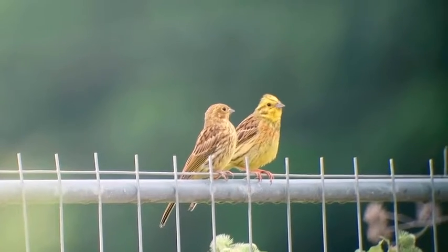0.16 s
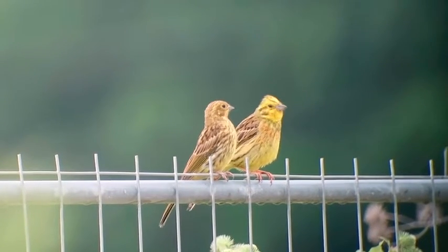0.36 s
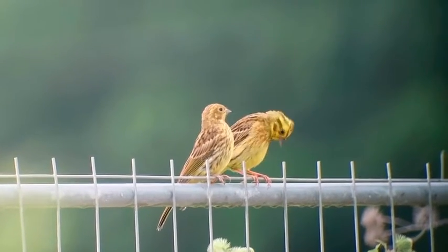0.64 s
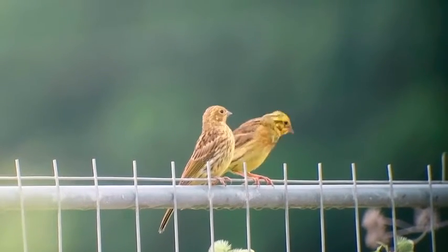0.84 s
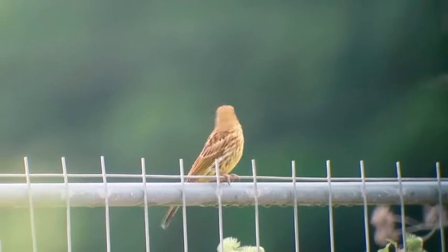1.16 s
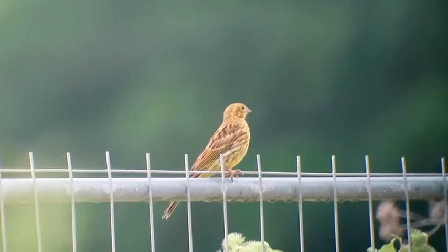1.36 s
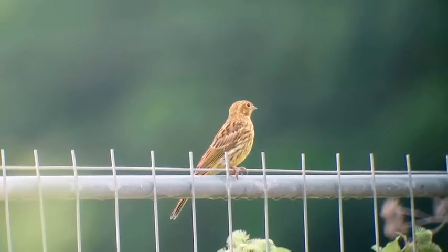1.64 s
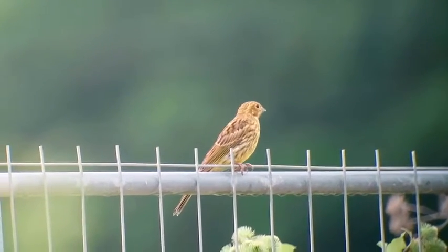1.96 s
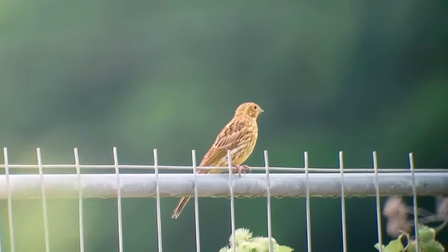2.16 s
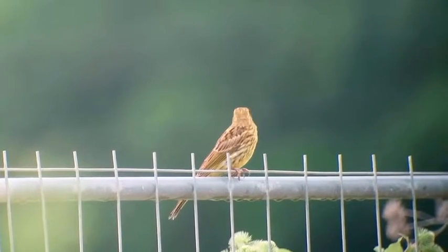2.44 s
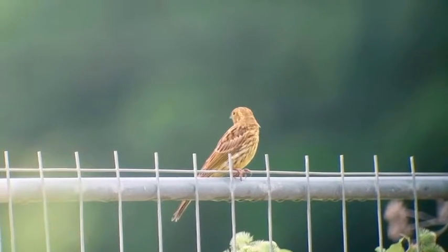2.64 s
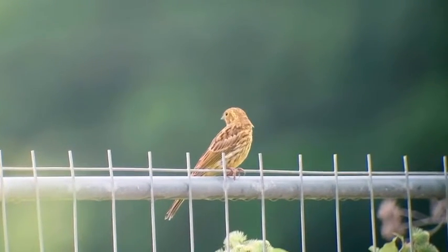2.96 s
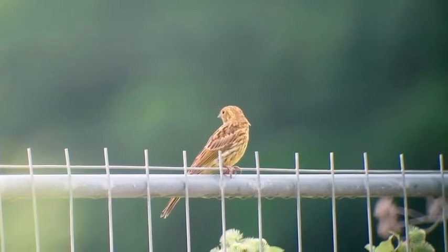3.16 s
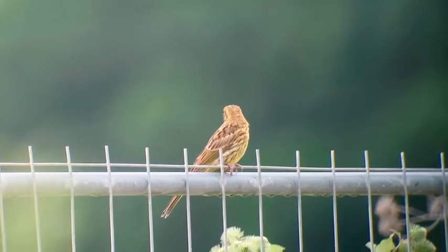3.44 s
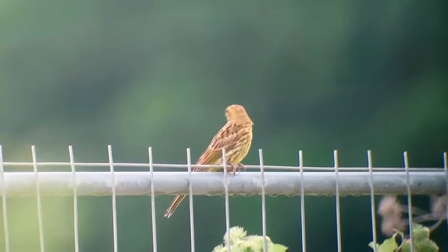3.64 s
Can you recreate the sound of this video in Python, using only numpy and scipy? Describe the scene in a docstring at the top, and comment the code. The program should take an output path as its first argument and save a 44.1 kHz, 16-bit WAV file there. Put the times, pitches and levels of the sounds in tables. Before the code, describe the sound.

A distant songbird repeats falling buzzy trills with short whistles between, softly echoing; a nearer bird chirps once early. Low engine-like drone, traffic rumble and airy hiss lie beneath, with two small ticks close to the microphone.

```python
"""Countryside birdsong over a low drone

A distant songbird sings falling, buzzy trills (pulsed glides) with short curved whistles between them, in
scattered echoes; a nearer bird chirps once and farther birds twitter at random. A low engine-like drone, a
gliding tone with an unsteady octave, swells and fades over traffic hums, rumble and airy hiss (shaped noise).
Something ticks twice close to the microphone (decaying resonances), and a faint high sine whine fades away."""
import sys
import numpy as np
from scipy import signal
from scipy.io import wavfile
from scipy.ndimage import uniform_filter1d

SR = 44100
rng = np.random.default_rng(int(sys.argv[2]) if len(sys.argv) > 2 else 0)


def transcribe(u):
    """Save the signal u as a 16-bit wav file named by the first command-line argument.

    u: samples, shape (n,) or (channels, n), limited to [-1, 1]; the rate is SR.
    q: integer samples, one column per channel.
    """
    v = np.clip(np.atleast_2d(u).T, -1, 1)
    q = np.round(v * 32767).astype(np.int16)
    wavfile.write(sys.argv[1], SR, q)


N = 167580
T = np.arange(N) / SR

# Falling trills of the far bird, levels before pulsing and echoes; a start below 0 plays at 0:
# start_s, length_s, first_pitch_hz, last_pitch_hz, bend (exponent of the fall), pulses_per_s,
# pulse_sweep_hz, rasp_hz, loudest_at (share of length), level_db
TRILL_NOTES = [(-.008, .215, 3800, 2530, 1.2, 41, -520, 250, .48, -35),
               (.745, .16, 4000, 2950, 2.4, 59, 600, 170, .5, -46.5),
               (1.125, .16, 3950, 2950, 3.6, 59, 450, 110, .72, -43.5),
               (1.458, .29, 4080, 2440, 1.3, 41, -380, 290, .36, -42),
               (2.258, .16, 4200, 2930, 2.6, 61, 680, 130, .56, -35.5),
               (2.609, .175, 4200, 2960, 3, 63, 620, 130, .66, -36.5),
               (3.105, .162, 4350, 2960, 2.6, 62, 700, 150, .72, -36),
               (3.665, .28, 3950, 2550, 1.2, 43, -400, 190, .4, -42)]
# Whistles of the far bird, levels before echoes; rasp is 1.4 times the rms pitch jitter:
# start_s, length_s, first_pitch_hz, middle_pitch_hz, last_pitch_hz, level_db, left_lead_ms, rasp_hz
WHISTLE_NOTES = [(.05, .075, 4350, 4000, 3920, -52, .09, 80), (.3, .019, 4400, 4600, 4500, -50, -.04, 100),
                 (.39, .06, 5500, 5300, 4700, -49, .1, 140),
                 (.448, .041, 4500, 4280, 4150, -43.5, .055, 35),
                 (.487, .038, 4200, 4010, 3880, -39.5, .06, 40),
                 (.669, .041, 4330, 4250, 4330, -44, .01, 130), (1.038, .03, 4180, 4190, 4230, -52, 0, 80),
                 (1.26, .025, 3980, 3920, 4000, -51, 0, 60), (1.41, .06, 3900, 4030, 4130, -55, .03, 80),
                 (1.705, .075, 3900, 3400, 3300, -54, .04, 130),
                 (1.845, .04, 4300, 4190, 4300, -44.5, -.04, 120),
                 (1.977, .081, 4450, 4020, 3870, -42, .046, 40),
                 (2.187, .04, 4300, 4180, 4280, -43.5, .035, 130),
                 (2.535, .036, 4350, 4170, 4100, -40, .057, 160),
                 (2.575, .012, 3380, 3400, 3400, -44, .06, 40),
                 (2.595, .013, 3400, 3440, 3420, -42, .06, 40),
                 (2.615, .055, 3420, 3400, 3330, -40.5, .07, 25),
                 (2.808, .05, 4390, 3805, 3170, -45, .12, 140),
                 (2.873, .069, 7540, 7700, 7950, -56, -.03, 40),
                 (2.975, .051, 3600, 3580, 3560, -46, .09, 50),
                 (3.035, .04, 4250, 4170, 4250, -43, .068, 160),
                 (3.095, .11, 7900, 7975, 7940, -54, -.02, 20),
                 (3.2, .055, 7940, 7830, 7620, -58, -.02, 40),
                 (3.398, .042, 4320, 4164, 3750, -46, .066, 170),
                 (3.432, .016, 2770, 2900, 2990, -41.5, .028, 50),
                 (3.453, .044, 3550, 3440, 3100, -43, .05, 70),
                 (3.475, .05, 4250, 4050, 3950, -51, .06, 140),
                 (3.525, .06, 4050, 3850, 3600, -48, .09, 160), (3.561, .014, 2870, 2940, 2940, -42, 0, 50),
                 (3.589, .042, 3610, 3440, 3150, -43, .06, 80)]
# The near chirp, a pulsed upper voice over a harsh lower one; columns as for the trills:
# start_s, length_s, first_pitch_hz, last_pitch_hz, bend (exponent), pulses_per_s,
# pulse_sweep_hz, rasp_hz, loudest_at (share of length), level_db
CHIRP_VOICES = [(.3155, .04, 5700, 5380, 1, 125, -350, 130, .54, -27),
                (.319, .07, 4650, 4550, 1, 210, 300, 280, .47, -28.5)]
# Path of the drone, levels before its two trims: start_s, pitch_hz, fundamental_db, octave_db
DRONE_PATH = [(0.0, 78.4, -25.5, -35.5), (.11, 79.3, -27, -34), (.21, 78.64, -22, -40.5),
              (.36, 78.07, -23, -42.5), (0.47, 78.1, -27.5, -47), (0.75, 78.9, -17.5, -40),
              (1.07, 78.17, -17, -46), (1.2, 79.5, -22, -36), (1.279, 76.9, -40, -35),
              (1.359, 76.8, -25.5, -46.5), (1.5, 79.3, -22.5, -33.5), (1.65, 78.63, -22, -40.5),
              (1.779, 78.9, -31.5, -39), (1.9, 78.21, -22, -40), (2.18, 78.9, -32.5, -45),
              (2.43, 81.53, -34.5, -39), (2.5, 77.5, -41, -32), (2.91, 79.1, -32, -38.5),
              (3.04, 78.43, -20, -35.5), (3.15, 78.18, -22, -36), (3.21, 77.88, -28, -36),
              (3.48, 77.83, -19, -40), (3.73, 77.8, -23, -54), (3.8, 76.1, -23.5, -38)]
# Wavering hums of the traffic: pitch_hz, width_hz, level_db, loudest_s, swell_s
TRAFFIC_HUMS = [(43.1, 5.4, -44.5, 1.7, 6.8), (236.2, 7.2, -39, 0.28, 0.52), (240.7, 7.2, -40, 2.5, 0.83),
                (235.4, 6, -32, 3.73, 0.24), (292.6, 3.3, -46.5, 0.58, 3.23), (305.3, 34, -39, 2.306, 0.19),
                (656, 89, -44, 0.63, 0.2), (1188, 7.8, -61.5, 2, 6.3)]
# Relative colour of the rumble and hiss: frequency_hz, density_db (per Hz)
AIR_COLOUR = [(12, -46.5), (25, -22), (55, -4.5), (85, -9.5), (122, -12), (200, -16), (300, -21),
              (400, -24), (570, -26.5), (850, -27), (1200, -31), (1400, -34), (2170, -37), (4000, -41),
              (5000, -43.5), (6300, -46.5), (8000, -49.5), (9400, -51.5), (10300, -68.5), (12500, -60),
              (14000, -99)]
# Left-right likeness of the air, 1 the same, 0 unrelated, -1 opposite: frequency_hz, likeness (-1 to 1)
AIR_LIKENESS = [(30, 0.98), (130, 1), (260, 0.85), (500, 0.19), (1000, -0.16), (2200, -0.54), (4000, -0.53),
                (9000, -0.69)]
# Relative level of the rumble and hiss above the bass: start_s, level_db
AIR_RIDE = [(0, 2.5), (0.551, 2), (0.998, -1.5), (1.348, -0.5), (1.801, 1), (2.249, 2.5), (2.8, 2.5),
            (3.3, 3), (3.8, -1.5)]
# Fading of the thin whine: start_s, level_db
WHINE_FADE = [(0, -63), (1.4, -66.5), (1.55, -73.5), (3.8, -85.5)]
# The two ticks, gain over the ringing modes: start_s, level_db, treble_tilt_db (per octave), rise_s
TICK_HITS = [(2.2249, -13.2, 0, .0004), (3.6525, -20.5, -8, .0006)]
# What a tick rings with, levels before tilt and gain: pitch_hz, level_db, t60_s
TICK_RING = [(318, -8.5, .04), (421, -3, 0.032), (702, -17, 0.09), (2740, -7, 0.024), (4150, -7, .005),
             (4500, 11.5, 0.0055), (5970, 2.5, 0.011), (9820, -11, 0.0028)]

# A positive lead puts the left ear's phase ahead, a negative one the right's.
TRILL_LEAD_MS, CHIRP_LEAD_MS, TICK_LEAD_MS = 0.07, -0.071, -.09
TRILL_EDGE_DB, PULSE_SHARP, PULSE_GAP, OCTAVE_DB = -8, 1.6, .06, -28  # the gap is the gain between pulses
RASP_SKEW, WHISTLE_SWELL = .9, 0.68  # exponents
FAR_RIGHT_DB = -3.5
TRILL_BLUR_DB, TRILL_BLUR_T60_S = -7, .06
BLUR_DB, BLUR_T60_S = -1.5, 0.047
ECHO_DB, ECHO_T60_S = -11.5, 0.48
CHIRP_ECHO_DB, CHIRP_ECHO_T60_S = -8, .13
DRONE_TRIM_DB, OCTAVE_TRIM_DB, OCTAVE_WIDTH_HZ = -1, 3, 16.3
AIR_DB, PATCH_DB, SWELL_DB = -31.5, 1.5, .6  # overall rms, then rms of the drifts
WHINE_HZ = 8240
TWITTER_PER_S, TWITTER_DB, TWITTER_RASP_HZ = 63, -61.5, 170
TWITTER_HZ, TWITTER_MEAN_S = 3570, 0.064  # centre pitch and average length
TWITTER_SPREAD, TWITTER_FALL = .11, 0.046  # shares of the pitch: half the largest shift each way, half the fall
TICK_BOUNCE_S, TICK_BOUNCE_DB, TICK_ECHO_DB = .0102, -20, -19
EDGE_HZ = 14500


def amp(db):
    """Decibels to gain."""
    return 10 ** (np.asarray(db) / 20)


def unit(x):
    """Scales to rms 1."""
    return x / np.sqrt(np.mean(abs(x) ** 2) + 1e-20)


def read(points, hz):
    """Reads a table on a log-frequency axis."""
    f, value = np.transpose(points)
    return np.interp(np.log(hz + 1), np.log(f + 1), value)


def add(mix, s, sound):
    """Mixes a stereo sound in at a time."""
    part = mix[:, max(round(s * SR), 0):][:, :sound.shape[1]]
    part += sound[:, :part.shape[1]]


def wander(width_hz, size=N):
    """Complex noise of rms 1, held to a narrow band around 0 Hz so that it drifts smoothly."""
    z = rng.standard_normal((size, 2)) @ [1, 1j]
    band = np.exp(-2 * (np.fft.fftfreq(size, 1 / SR) / width_hz) ** 2)
    return unit(np.fft.ifft(z * band))


def tone(hz, lead_ms):
    """A gliding stereo sine of rms 1 whose right side trails in phase by the left ear's lead."""
    turns = np.cumsum(hz) / SR
    both_ears = np.array([turns, turns - hz * lead_ms / 1000])
    return np.sqrt(2) * np.sin(2 * np.pi * both_ears)


def trees(x, t60):
    """Scattered echoes from ground and foliage: sparse decaying spikes, different on each side."""
    t = T[:SR // 2]
    spikes = rng.standard_normal((2, len(t))) * (rng.random((2, len(t))) < .05)
    tail = spikes * amp(-60 * t / t60)
    tail = tail / np.linalg.norm(tail, axis=1)[:, None]
    return signal.fftconvolve(x, tail, axes=1)[:, :N]


def trill(length, first_hz, last_hz, bend, rate, sweep_hz, rasp_hz, peak, db, lead_ms):
    """A falling note chopped into quick pulses, each a tiny glide; rough midway, clean at both ends."""
    t = T[:int(length * SR)]
    u = t / length
    cycle = (t * rate) % 1
    fall = last_hz + (first_hz - last_hz) * (1 - u) ** bend
    jitter = np.sqrt(2) * wander(900, size=SR // 2).real[:len(t)]
    rasp = rasp_hz * np.sin(np.pi * u ** RASP_SKEW) ** 2 * jitter
    hz = fall + sweep_hz * (cycle - .5) + rasp
    arch_db = TRILL_EDGE_DB * ((u - peak) / max(peak, 1 - peak)) ** 2
    ramps = np.minimum(np.minimum(u, 1 - u) * 20, 1)
    pulses = PULSE_GAP + (1 - PULSE_GAP) * abs(np.sin(np.pi * cycle)) ** PULSE_SHARP
    voice = tone(hz, lead_ms) + amp(OCTAVE_DB) * tone(2 * hz, lead_ms)
    return amp(db + arch_db) * ramps * pulses * voice


def whistle(length, first_hz, middle_hz, last_hz, db, lead_ms, rasp_hz):
    """One curved glide with a jittering pitch that swells and fades."""
    u = np.linspace(0, 1, int(length * SR))
    curve = np.polyfit([0, .5, 1], [first_hz, middle_hz, last_hz], 2)
    hz = np.polyval(curve, u) + rasp_hz * wander(320, size=SR // 2).real[:len(u)]
    return amp(db) * abs(np.sin(np.pi * u)) ** WHISTLE_SWELL * tone(hz, lead_ms)


def far_song():
    """Distant trills and whistles, blurred by short echoes and a longer tail, softer on the right."""
    trills, whistles = np.zeros((2, 2, N))
    for start, *note in TRILL_NOTES:
        add(trills, start, trill(*note, TRILL_LEAD_MS))
    for start, *note in WHISTLE_NOTES:
        add(whistles, start, whistle(*note))
    direct = trills + whistles
    trill_blur = amp(TRILL_BLUR_DB) * trees(trills, TRILL_BLUR_T60_S)
    whistle_blur = amp(BLUR_DB) * trees(whistles, BLUR_T60_S)
    echo = amp(ECHO_DB) * trees(direct, ECHO_T60_S)
    return (direct + trill_blur + whistle_blur + echo) * amp([[0], [FAR_RIGHT_DB]])


def drone():
    """A swelling low tone and its unsteady octave, the same in both ears."""
    s, *columns = np.transpose(DRONE_PATH)
    hz, low_db, octave_db = (np.interp(T, s, c) for c in columns)
    turn = np.exp(2j * np.pi * np.cumsum(hz) / SR)
    low = amp(low_db + DRONE_TRIM_DB) * turn
    # squaring the rotation doubles the pitch
    octave = amp(octave_db + OCTAVE_TRIM_DB) * turn ** 2 * wander(OCTAVE_WIDTH_HZ)
    return np.sqrt(2) * (low + octave).real


def traffic_hums():
    """Fainter hums, each a tone wavering in level and phase under one smooth swell."""
    out = np.zeros(N)
    for hum_hz, width_hz, db, peak_s, swell_s in TRAFFIC_HUMS:
        swell = amp(db) * np.exp(-((T - peak_s) / swell_s) ** 2)
        hum = wander(width_hz) * np.exp(2j * np.pi * hum_hz * T)
        out += np.sqrt(2) * (swell * hum).real
    return out


def air():
    """Rumble and hiss: coloured noise with drifting patches; the bass is nearly the same on both sides."""
    frames, hz = N // 512 + 5, np.fft.rfftfreq(2048, 1 / SR)
    a, b, c, d, patches = rng.standard_normal((frames, len(hz), 5)).T
    patches = uniform_filter1d(patches, size=16, axis=0)  # across frequency
    patches = unit(uniform_filter1d(patches, size=8, axis=1))  # across time
    swell = unit(uniform_filter1d(rng.standard_normal(frames), size=40))
    same = np.clip(read(AIR_LIKENESS, hz), -1, 1)[:, None]
    left = a + 1j * b
    right = same * left + np.sqrt(1 - same ** 2) * (c + 1j * d)
    ride = np.interp(np.arange(frames) * 512 / SR, *np.transpose(AIR_RIDE))
    ride = ride * (hz > 130)[:, None]  # leaves the bass alone
    colour = read(AIR_COLOUR, hz)[:, None]
    z = np.array([left, right]) * amp(colour + ride + PATCH_DB * patches + SWELL_DB * swell)
    noise = signal.istft(z, nperseg=2048, noverlap=1536)[1][:, :N]
    return amp(AIR_DB) * unit(noise)


def whine():
    """A faint high sine of fixed pitch that fades away."""
    return amp(np.interp(T, *np.transpose(WHINE_FADE))) * tone(np.full(N, WHINE_HZ), 0)


def twitter():
    """Short falling notes of farther birds, at random times, pitches and leads between the ears."""
    out = np.zeros((2, N))
    for at, pitch, size, side in rng.random((int(TWITTER_PER_S * N / SR), 4)):
        hz = TWITTER_HZ * (1 + TWITTER_SPREAD * (4 * pitch - 2))
        first_hz, last_hz = hz * (1 + TWITTER_FALL), hz * (1 - TWITTER_FALL)
        length, lead_ms = TWITTER_MEAN_S * (.5 + size), (side - .5) / 2
        note = whistle(length, first_hz, hz, last_hz, TWITTER_DB, lead_ms, TWITTER_RASP_HZ)
        add(out, at * N / SR, note)
    return out


def near_chirp():
    """One close chirp of two pulsed voices, drier than the far song."""
    near = np.zeros((2, N))
    for start, *note in CHIRP_VOICES:
        add(near, start, trill(*note, CHIRP_LEAD_MS))
    return near + amp(CHIRP_ECHO_DB) * trees(near, CHIRP_ECHO_T60_S)


def ticks():
    """Small dry knocks of decaying resonances near the microphone, with one bounce off the ground."""
    out = np.zeros((2, N))
    t = np.maximum(T[:SR // 10] - np.array([[0], [TICK_LEAD_MS]]) / 1000, 0)
    for start, level_db, tilt_db, rise_s in TICK_HITS:
        ring = np.zeros_like(t)
        for hz, db, t60 in TICK_RING:
            octaves = np.log2(hz / TICK_RING[0][0])  # above the first mode
            ring += amp(db + tilt_db * octaves - 60 * t / t60) * np.sin(2 * np.pi * hz * t)
        add(out, start, amp(level_db) * np.minimum(t / rise_s, 1) * ring)
    add(out, TICK_BOUNCE_S, amp(TICK_BOUNCE_DB) * out)
    return out + amp(TICK_ECHO_DB) * trees(out, BLUR_T60_S)


def scene():
    """Everything at the microphone."""
    birds = far_song() + twitter() + near_chirp()
    return birds + drone() + traffic_hums() + air() + whine() + ticks()


def record(dry):
    """The recorder's band limit: a steep low-pass."""
    low_pass = signal.firwin(255, EDGE_HZ, window=("kaiser", 9), fs=SR)
    return signal.oaconvolve(dry, low_pass[None], "same")


dry = scene()
out = record(dry)
transcribe(out)
```